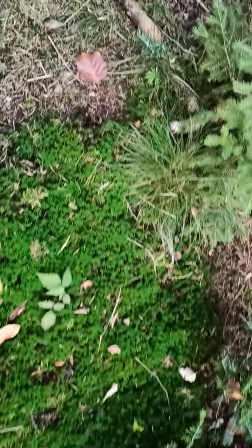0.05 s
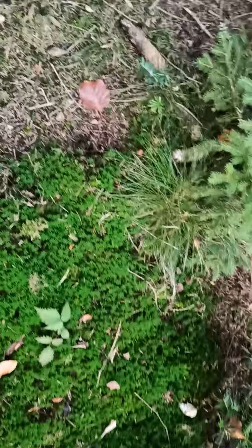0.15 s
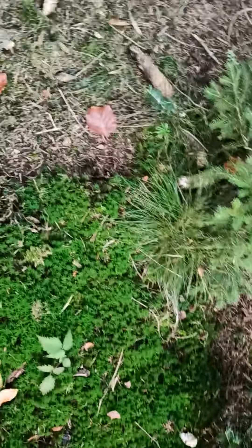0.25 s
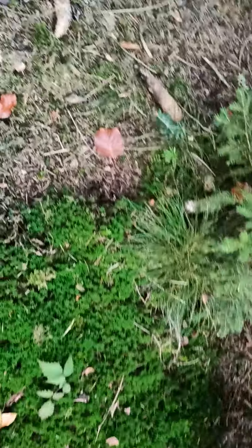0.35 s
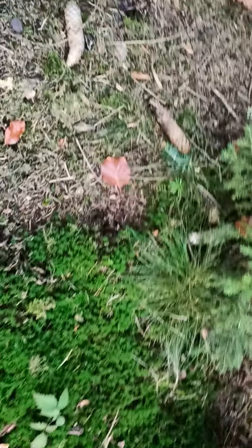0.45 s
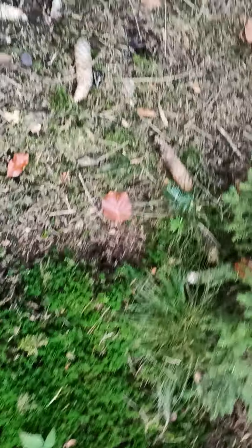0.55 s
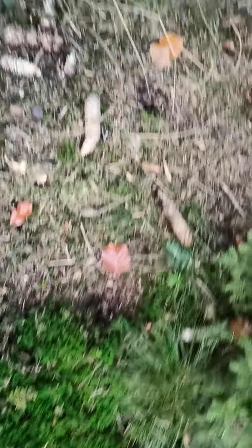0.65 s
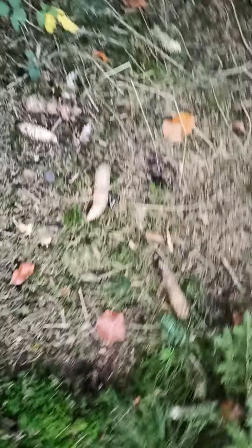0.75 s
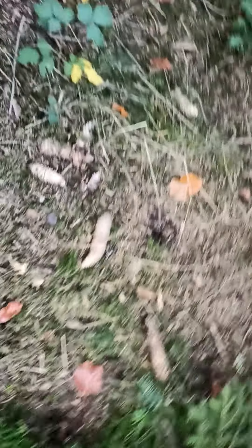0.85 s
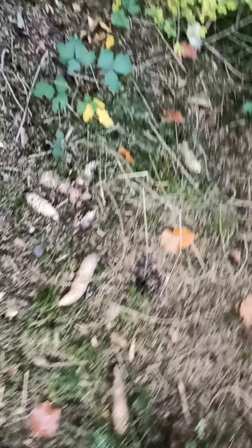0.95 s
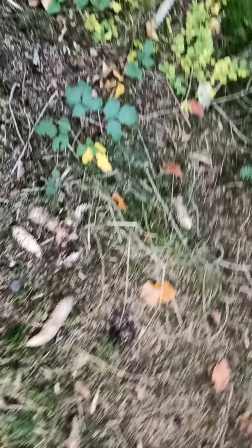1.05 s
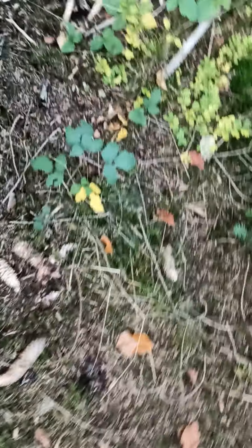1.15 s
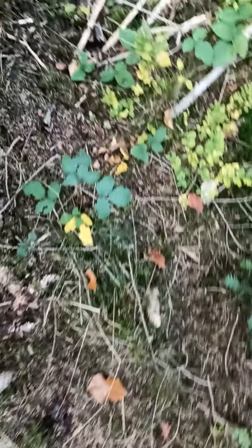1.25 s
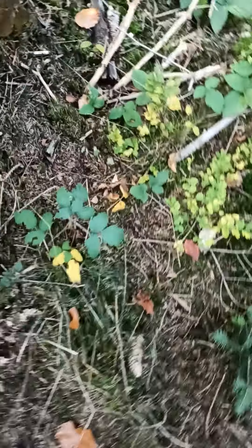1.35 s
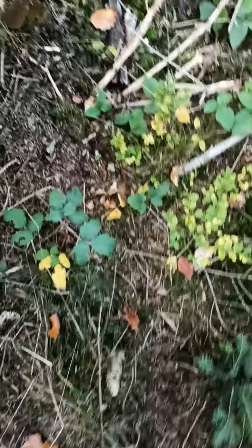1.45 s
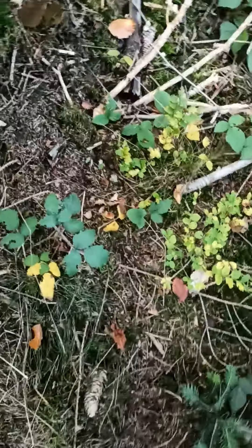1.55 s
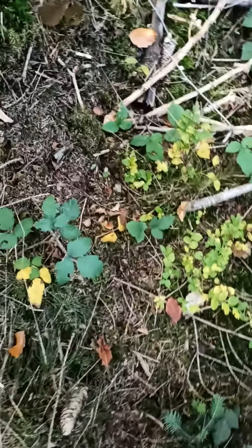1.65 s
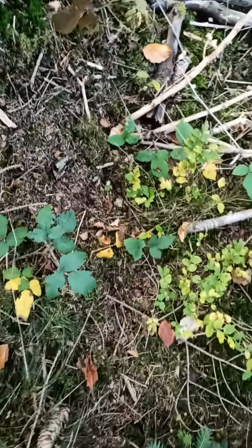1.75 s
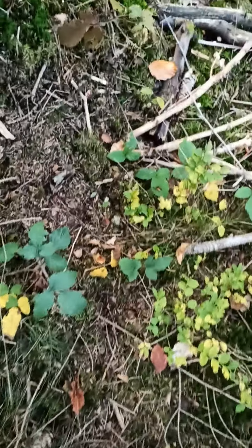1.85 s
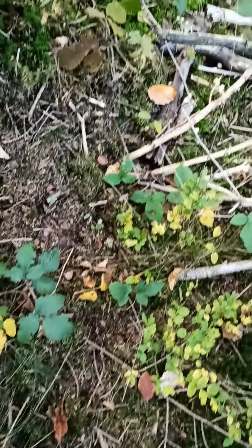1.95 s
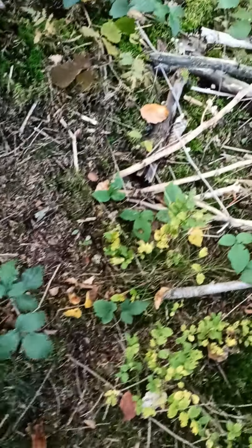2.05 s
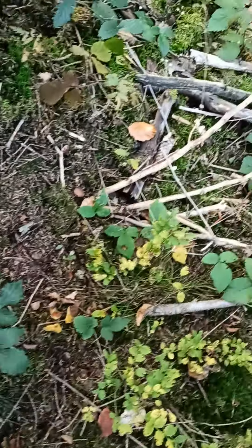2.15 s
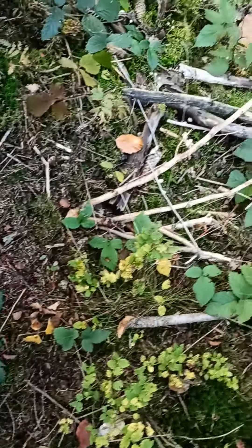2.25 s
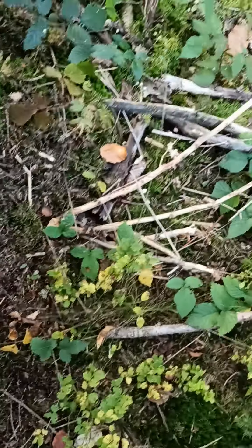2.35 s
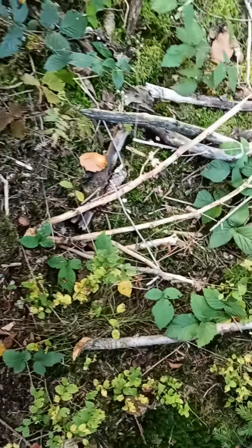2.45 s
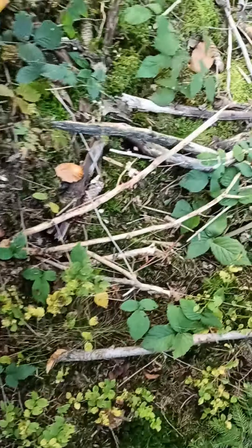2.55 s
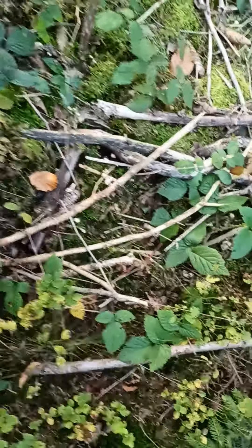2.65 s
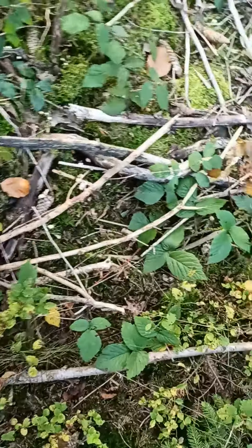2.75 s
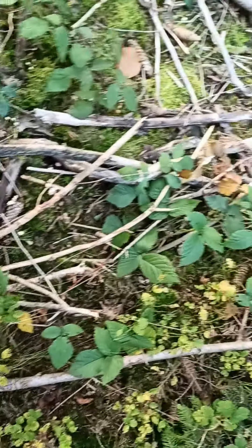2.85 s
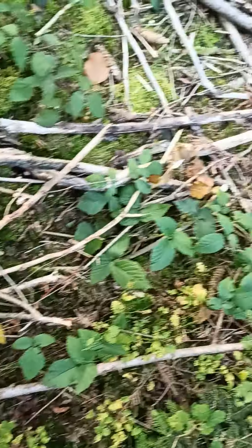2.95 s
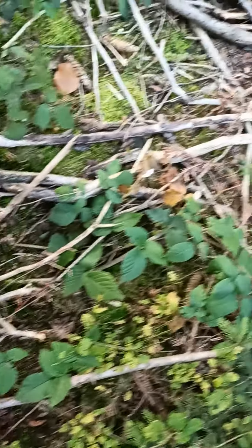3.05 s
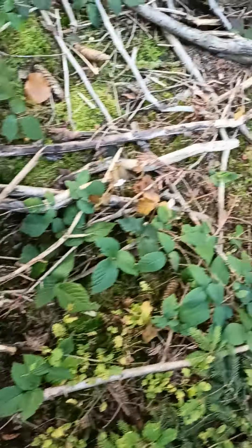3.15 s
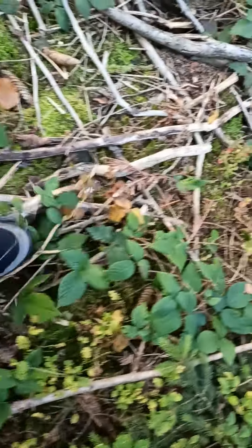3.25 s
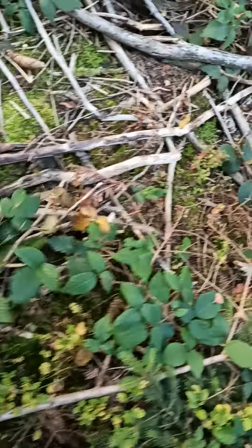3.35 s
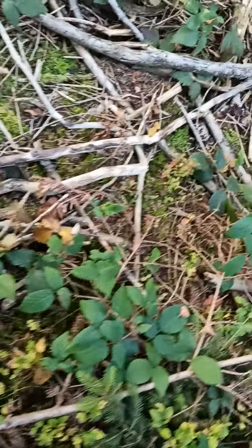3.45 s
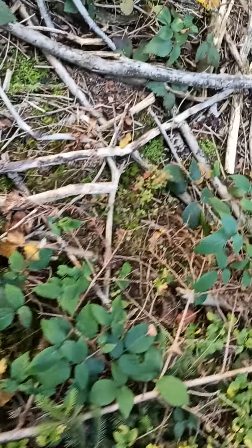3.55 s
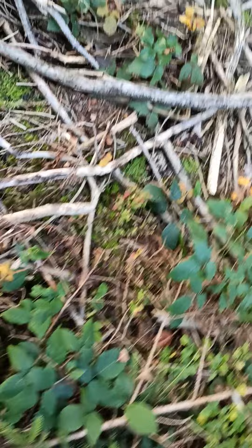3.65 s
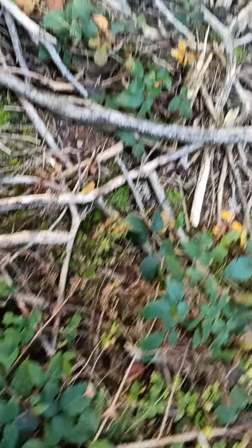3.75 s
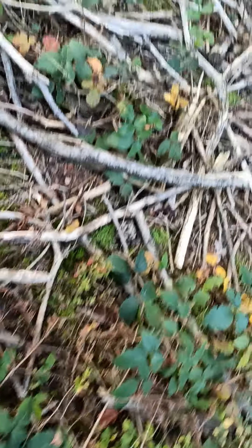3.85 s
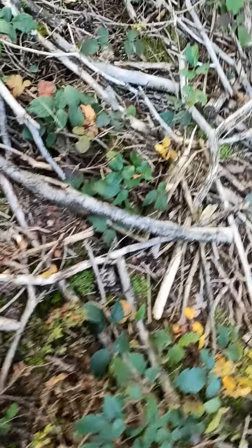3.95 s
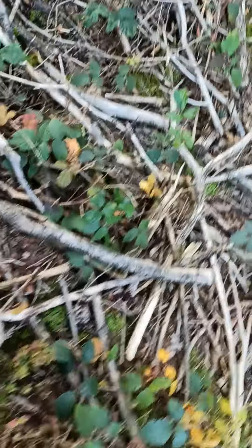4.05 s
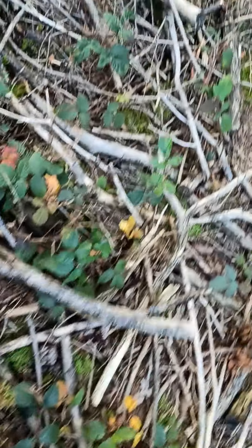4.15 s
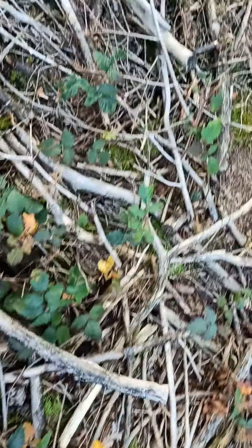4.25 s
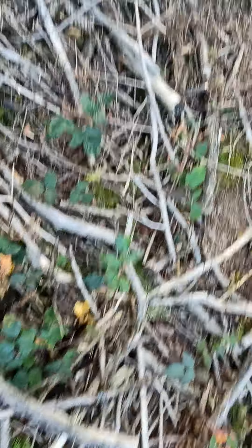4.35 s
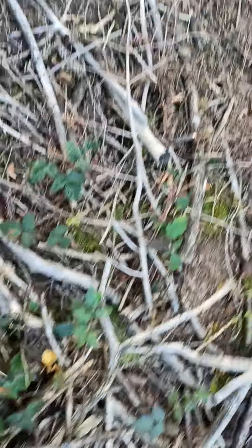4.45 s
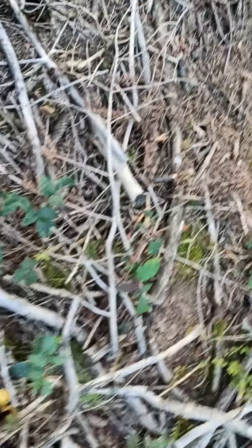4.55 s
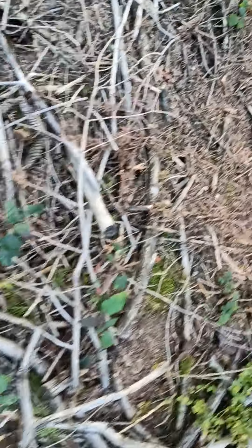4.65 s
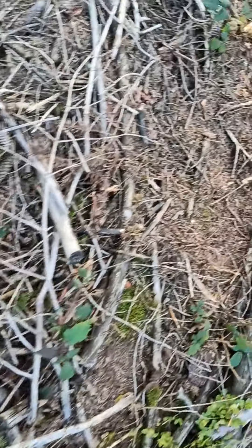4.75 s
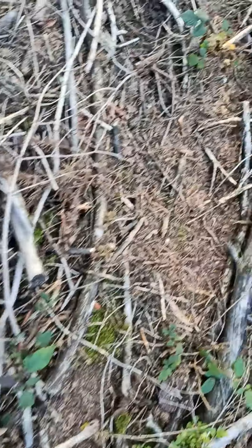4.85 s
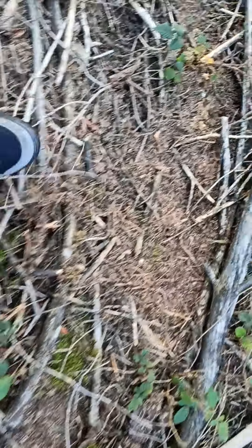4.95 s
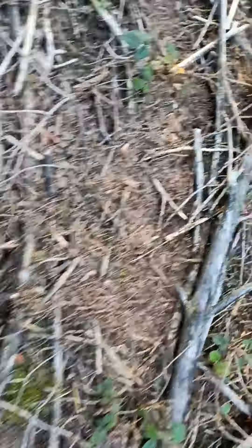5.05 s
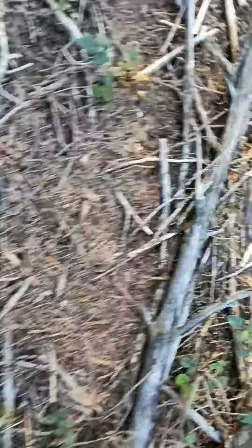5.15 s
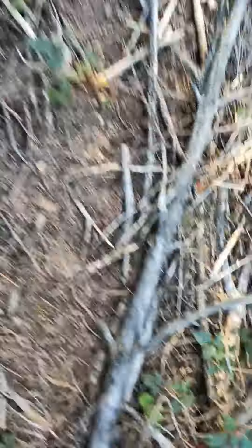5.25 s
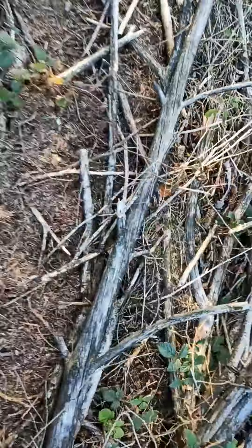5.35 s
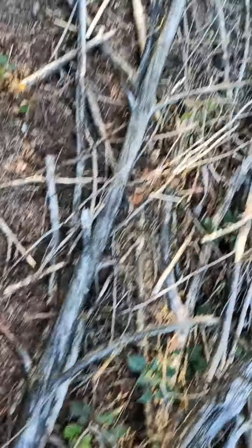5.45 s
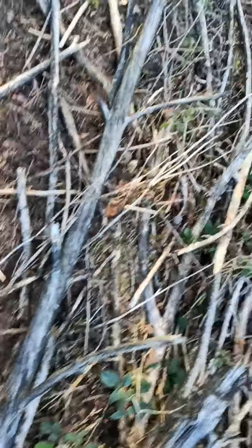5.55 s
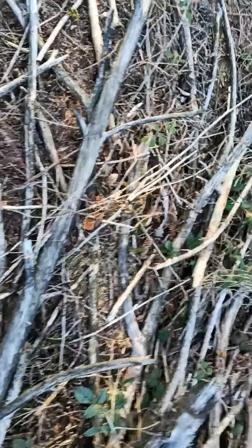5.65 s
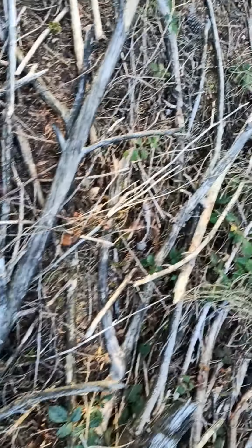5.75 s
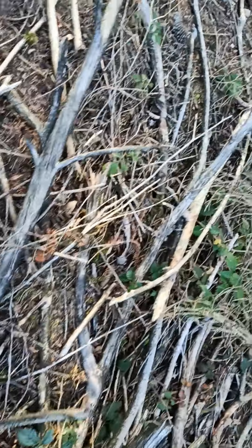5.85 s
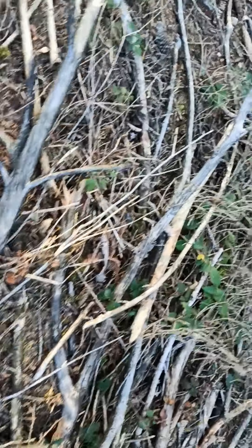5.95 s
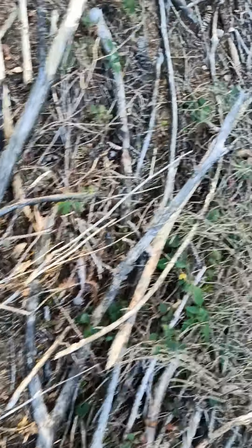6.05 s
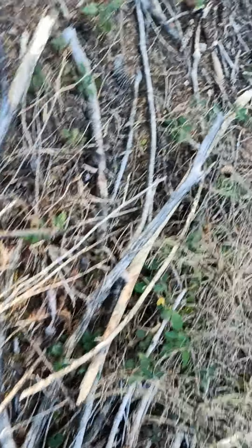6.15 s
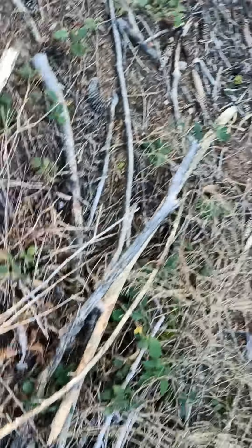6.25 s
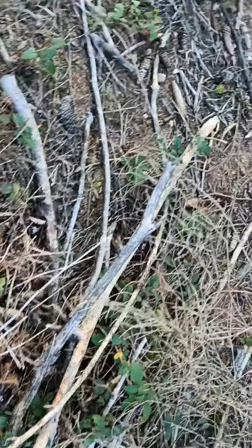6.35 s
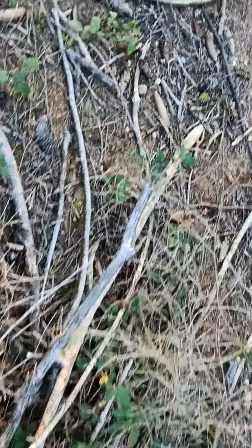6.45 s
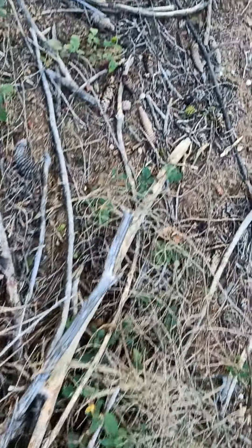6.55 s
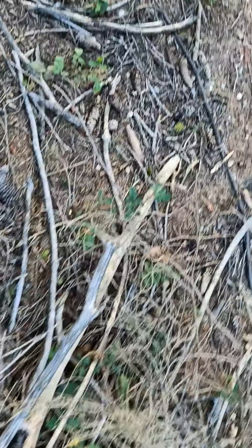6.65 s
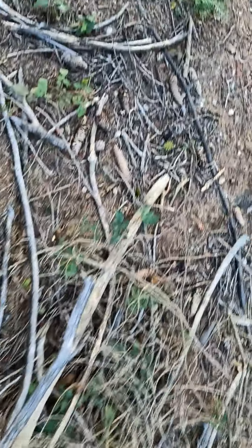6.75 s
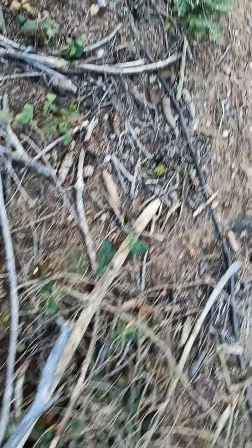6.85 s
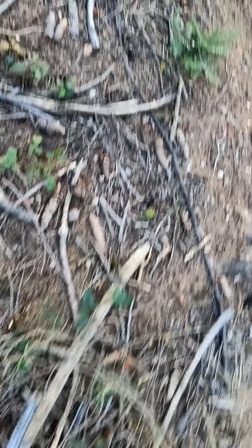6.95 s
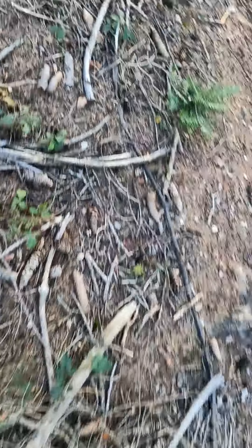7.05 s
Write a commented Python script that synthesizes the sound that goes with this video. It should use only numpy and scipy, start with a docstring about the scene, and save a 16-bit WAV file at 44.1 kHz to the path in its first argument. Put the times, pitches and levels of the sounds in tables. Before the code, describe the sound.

A walker treads through a quiet forest, quiet rustles giving way to crackling fallen branches, brittle snaps in quick runs and dull thuds.

```python
"""Forest path, a walker's shoes close by: first soft moss, then dry twigs and fallen branches.
Each step presses the litter into a fine crackle, made of clumped tiny noise bursts in four layers.
Twigs snap singly and in quick runs: bright noise bursts with a short wooden knock.
The weight lands with dull thuds, low damped swings with a rumble; ground and trunks scatter the cracks.
A faint steady hush lies behind; the microphone is bright and uneven in the treble."""
import sys
import numpy as np
from scipy import signal
from scipy.fft import rfft, irfft
from scipy.io import wavfile
from scipy.ndimage import uniform_filter1d

SR = 44100
rng = np.random.default_rng(int(sys.argv[2]) if len(sys.argv) > 2 else 0)


def generate_wav(sig):
    """Save sig (samples, or channels by samples) to the path in sys.argv[1] as 16-bit PCM at SR."""
    pcm = np.round(np.clip(np.atleast_2d(sig).T, -1, 1) * 32767).astype(np.int16)
    wavfile.write(sys.argv[1], SR, pcm)


N = 312669

# Loud twigs, levels as energy over 1 ms before the trims in snap():
# start_s, crack_db, splinter_fizz_db, wood_knock_db, wood_pitch_hz, decay_ms
LOUD_TWIGS = [(.9918, -51.5, -58, -54, 2930, 1.3), (1.151, -55, -43.5, -42, 1130, 1),
              (1.4823, -66, -69, -45.5, 535, 4.8), (1.7444, -67, -69, -49.5, 825, 4.5),
              (2.2336, -60, -54, -50.5, 1888, 1.7), (2.826, -52, -51, -45.5, 1410, 0.61),
              (3.276, -64, -61, -43, 1350, 3.9), (3.3158, -68, -69, -41, 700, 3.3),
              (3.372, -39.5, -44, -37, 1186, 6.6), (3.4503, -27.5, -25.5, -26.5, 2165, 2.7),
              (3.463, -32, -43, -38, 2390, 1.6), (3.588, -35, -30.5, -35.5, 1760, 2.1),
              (3.632, -30.5, -29.5, -28.5, 2810, 2.2), (3.9208, -59, -54, -39, 2110, 1.36),
              (4.285, -40, -37, -50, 2734, 0.49), (4.318, -35.5, -30.5, -24.5, 2060, 0.45),
              (4.4618, -28, -27, -28.5, 3660, 1.6), (4.6077, -36, -25, -43.5, 2310, 1.7),
              (4.6746, -39, -28.5, -46, 2400, 2.8), (4.7531, -29.5, -22, -36, 1840, 1.6),
              (4.8107, -45.5, -43, -54, 1810, 1.9), (4.9195, -30, -35, -24, 2315, 3.8),
              (4.9583, -38, -30, -40, 2980, 2.9), (5.099, -41.5, -32.5, -34.5, 5410, 2.1),
              (5.186, -35, -43, -35.5, 2050, 3.1), (5.1976, -25.5, -23, -23, 2260, 2.1),
              (5.2425, -40, -27.5, -21.5, 2322, 0.94), (5.261, -43, -39, -34, 1420, 2.4),
              (5.3545, -38, -33, -32.5, 2133, 1.6), (5.4561, -35, -26, -26.5, 1387, 1),
              (5.4633, -27, -31, -27, 1490, 1.4), (5.4682, -25, -26, -17, 2700, 0.85),
              (5.479, -33, -30, -26.5, 1800, 1.4), (5.6156, -31.5, -34, -41, 2920, 0.96),
              (5.6474, -37.5, -47, -37.5, 2050, .7), (5.7211, -48, -51, -45, 1340, 1.5),
              (5.903, -42.5, -42, -36.5, 980, 2.1), (5.9135, -39, -40, -29.5, 950, 0.75),
              (5.923, -38.5, -39, -39.5, 1720, 0.78), (6.0057, -28.5, -18.5, -33, 1900, 2.9),
              (6.0173, -37, -35, -29.5, 1610, 0.87), (6.053, -41, -33.5, -43, 2250, 0.57),
              (6.0783, -46, -43, -31.5, 2860, 1.7), (6.103, -33.5, -31.5, -33, 2650, 2.2),
              (6.1241, -49, -41, -30.5, 1620, 0.87), (6.1398, -29, -29, -24, 1730, 2.1),
              (6.17, -36, -37, -41, 2500, 0.74), (6.1895, -38, -35, -37.5, 1037, 3.7),
              (6.2252, -51.5, -32.5, -28, 1520, 2.7), (6.2488, -30.5, -24, -29.5, 1670, 0.33),
              (6.2695, -32, -30, -35, 3130, 5.8), (6.279, -31, -17, -29, 1420, 1.2),
              (6.348, -27.5, -40, -40, 1210, 2.6), (6.3523, -25.5, -26, -23, 730, 0.5),
              (6.4096, -30.5, -26, -32.5, 1440, 0.6), (6.4509, -23.5, -39, -28, 1600, 0.88),
              (6.467, -54, -43, -32, 3030, 0.73), (6.5243, -39, -41, -43, 3160, 1.2),
              (6.546, -37.5, -30, -39, 2700, 0.44), (6.666, -55, -47, -48, 2950, 0.63),
              (6.8652, -66, -61, -39.5, 1787, 1.6), (7.037, -37, -41, -39, 1215, 0.72),
              (7.0734, -39, -35, -33, 1320, 0.56), (7.0817, -31, -32, -35, 1070, 1)]
# Lesser twigs break by chance, more often and more loudly the harder the shoe presses
SMALL_MAX_PER_S, SMALL_HALF_RATE_DB, SMALL_SPREAD_DB = 22, -51, 1
# crack and fizz above the crackle level, wood above the crunch level
SMALL_CRACK_DB, SMALL_FIZZ_DB, SMALL_WOOD_DB = 6, 6.5, 12.5
SMALL_HZ, SMALL_OCTAVES, SMALL_DECAY_MS = 1800, 0.25, 1.14

# A shoe presses or brushes the litter, levels before the layer trims in litter():
# start_s, swell_s, hold_s, needle_crackle_db, small_twig_crunch_db, soil_db
SHOE_PRESSES = [(0, 0.0058, 0.18, -65, -64, -61), (0.623, 0.035, 0.19, -73, -68.5, -62),
                (1.149, 0.044, 0.014, -60.5, -59.5, -67), (1.261, 0.053, 0.0071, -61.5, -60, -63),
                (1.376, 0.041, 0.1, -63.5, -61.5, -58.5), (1.512, 0.056, 0.082, -67.5, -67, -73),
                (1.697, 0.05, 0.055, -67, -67, -58), (1.974, 0.098, 0.039, -62, -65, -62.5),
                (2.15, 0.041, 0.027, -65, -62.5, -63.5), (2.388, 0.023, 0.023, -62, -51, -64),
                (2.425, 0.054, .02, -62, -62.5, -74), (2.512, 0.022, 0.014, -52, -56.5, -64),
                (2.643, 0.068, 0.15, -68.5, -62.5, -66), (3.249, 0.018, 0.02, -59, -51.5, -55.5),
                (3.302, 0.034, 0.14, -51.5, -48.5, -52), (3.528, 0.072, 0.046, -56.5, -54, -53),
                (4.005, 0.007, 0.0083, -50, -54, -53.5), (3.936, 0.093, 0.13, -52.5, -56.5, -60.5),
                (4.168, 0.057, 0.11, -52, -53, -51), (4.351, 0.028, 0.098, -57, -59.5, -56.5),
                (4.588, 0.017, 0.037, -67, -61.5, -78), (4.715, .03, 0.24, -63.5, -80, -75),
                (4.93, 0.075, .17, -55.5, -62.5, -61), (5.099, 0.12, 0.073, -41, -47, -48.5),
                (5.295, 0.039, 0.085, -51, -54.5, -56), (5.434, 0.037, 0.1, -47.5, -57, -54),
                (5.597, 0.0072, 0.0067, -49.5, -61, -57), (5.921, 0.088, 0.052, -51, -61, -69),
                (6.09, 0.044, .09, -50, -54, -53.5), (6.204, 0.032, 0.092, -46, -53, -52),
                (6.369, 0.037, 0.012, -41, -48.5, -45.5), (6.452, 0.022, 0.21, -54.5, -60.5, -64),
                (6.742, 0.076, 0.015, -52, -54.5, -57), (6.92, 0.16, .02, -52.5, -51, -48.5)]
PRESS_SAG_DB_PER_S, PRESS_RELEASE_DB_PER_S, PRESS_SWELL_POWER = 26, 223, 1.31
# Between presses the undergrowth keeps stirring faintly
IDLE_CRACKLE_DB, IDLE_CRUNCH_DB, IDLE_SOIL_DB = -71.5, -68, -65.5
# Change of that stirring as the moss gives way to twigs: time_s, relative_level_db
STIRRING_CURVE = [(0, -1.5), (.35, -3.5), (.6, -3), (.8, 0), (1.9, -1), (2.8, 2), (3.15, 1), (3.8, 1.5),
                  (7, 2)]

# Spectra of the litter from top to bottom: frequency_hz, relative_level_db
NEEDLE_SPECTRUM = [(3500, -62), (4400, -3.5), (5000, 0.5), (7000, 1.5), (10000, -7.5), (13000, -0.5),
                   (16000, -5)]
SPLINTER_SPECTRUM = [(1500, -41), (2300, 0.5), (3000, -2.5), (3800, 1.5), (4600, 1), (5500, -8),
                     (8000, -57)]
SMALL_TWIG_SPECTRUM = [(300, -31), (600, -12), (800, 2.5), (1200, 1), (1900, -1.5), (2400, -7),
                       (3300, -16.5), (6000, -35)]
SOIL_SPECTRUM = [(20, -24), (50, -20), (90, 1.5), (140, -0.5), (210, -1.5), (300, 0.5), (450, -3.5),
                 (620, -4), (900, -15), (2000, -47.5)]

# Weight landing on the ground, level of the swing before its rise and decay:
# start_s, level_db, pitch_hz, decay_s
GROUND_THUDS = [(.775, -58, 85, 0.019), (3.048, -48, 85.2, 0.028), (3.075, -48.5, 113.7, 0.06),
                (3.272, -42, 166, 0.017), (3.313, -41, 209, 0.012), (3.466, -37, 133, 0.0092),
                (4.46, -35.5, 125, 0.015), (5.249, -43, 134.6, 0.021), (6.019, -38.5, 161, .01),
                (6.178, -40, 127, 0.016), (6.275, -27.5, 100, 0.0048), (6.351, -15, 125, 0.003),
                (6.778, -45, 386, 0.0089), (6.866, -43, 375, .006), (6.91, -43, 374, 0.0066)]
# When a twig gives way the shoe drops onto the ground, harder after a louder break
DROP_DB, DROP_HZ, DROP_DECAY_S, DROP_DELAY_S = -18.5, 125, 0.012, 0.0019

# Hush among the trees: frequency_hz, relative_level_db
AIR_SPECTRUM = [(20, -34), (50, 7), (90, -2.5), (330, 10.5), (500, 0.5), (800, -0.5), (1300, -2),
                (3000, -13), (8000, -21), (16000, -19)]
# Broad shelves of the microphone: frequency_hz, gain_db
MICROPHONE_SHELVES = [(4650, 0), (4800, -5.5), (6000, -4), (6200, 4), (8480, 3), (8650, -6), (11300, -11.5),
                      (11600, 0), (12700, -2), (15700, 2)]
# A dip and narrow resonances of the microphone: frequency_hz, width_hz, gain_db
MICROPHONE_PEAKS = [(1200, 420, -2.5), (6760, 500, 3.5), (7310, 690, 3.5), (7532, 220, 7.5), (8380, 330, 6)]
EDGE_HZ = 16050  # upper band limit


def amp(db):
    """Amplitude of a level in dB."""
    return 10 ** (np.asarray(db) / 20)


def evened(x):
    """Scales a sound to an RMS of one."""
    return x / np.sqrt(np.mean(x ** 2) + 1e-20)


def read(points, hz):
    """A spectrum joined by straight lines over log frequency."""
    point_hz, db = np.transpose(points)
    return np.interp(np.log(hz + 1), np.log(point_hz + 1), db)


def add(mix, start_s, sound):
    """Lays a sound into the mix in place."""
    part = mix[max(round(start_s * SR), 0):][:len(sound)]
    part += sound[:len(part)]


def colour(x, db_at, size=4096):
    """Causal filter with the gain db_at(Hz), so that clicks keep their sharp front."""
    log_gain = np.log(amp(db_at(abs(np.fft.fftfreq(size, 1 / SR)))))
    taps = np.fft.ifft(np.exp(np.conj(signal.hilbert(log_gain)))).real
    return signal.oaconvolve(x, taps[:size // 2])[:len(x)]


def band(x, lo_hz, hi_hz):
    """Keeps one frequency band."""
    edges = np.clip([lo_hz, hi_hz], 10, SR / 2 - 100)
    return signal.sosfilt(signal.butter(3, edges, "band", fs=SR, output="sos"), x)


def burst_at(x, db):
    """Scales a short sound to the energy that the level db has over 1 ms."""
    return amp(db) * x / np.sqrt(np.sum(x ** 2) / (SR / 1000) + 1e-20)


def snap(crack_db, fizz_db, wood_db, wood_hz, decay_ms, rise_ms=0.059, break_ms=0.15, octaves=0.84, ring=1.83):
    """Fibres tear in a short bright burst, and the freed stick knocks in many crowded, quickly damped modes."""
    ms = np.arange(SR // 20) * 1000 / SR
    noise = rng.standard_normal((4, len(ms)))
    decay_ms = max(decay_ms, 0.3)
    onset = 1 - np.exp(-ms / rise_ms)
    dying = onset * np.exp(-ms / decay_ms)
    # a few fibres give first, then the whole section breaks at once
    tearing = dying + 0.59 * np.exp(-(ms / break_ms - 2) ** 2)
    crack = burst_at(band(tearing * noise[0], 4150, 9100), crack_db + 2.0)
    fizz = burst_at(band(tearing * noise[1], 11640, 15400), fizz_db + 0.73)

    def stick_db(hz):
        """The knock is strongest near the pitch of the stick."""
        hump = 8 * np.exp(-0.5 * (np.log2((hz + 1) / wood_hz) / octaves) ** 2)
        return hump - 2.6 * np.log2(1 + hz / wood_hz)

    knock = band(colour(dying * noise[2], stick_db, size=512), 137, 9700)
    knock = burst_at(knock, wood_db + 0.32)
    # its low bending modes ring on a little longer
    ringing = onset * np.exp(-ms / (ring * decay_ms))
    bending = burst_at(band(ringing * noise[3], 160, wood_hz / 2), wood_db - 7)
    return crack + fizz + knock + bending


def twigs():
    """The loud twigs that break outright."""
    out = np.zeros(N)
    for start_s, *twig in LOUD_TWIGS:
        add(out, start_s, snap(*twig))
    return out


def small_twigs(crackle_db, crunch_db, count=320):
    """Thin twigs lie all along the way; the pressure on each sets its chance of breaking."""
    out = np.zeros(N)
    place, luck = rng.random((count, 2)).T
    character = np.clip(rng.standard_normal((count, 4)), -1.5, 1.5)
    for k, (strength, bright, woody, pitch) in enumerate(character):
        at = int((k + place[k]) / count * (N - 1))
        per_s = SMALL_MAX_PER_S / (1 + amp(SMALL_HALF_RATE_DB - crackle_db[at]))
        if luck[k] < per_s * N / SR / count:
            db = crackle_db[at] + SMALL_SPREAD_DB * strength
            crack_db = db + SMALL_CRACK_DB
            fizz_db = db + SMALL_FIZZ_DB + SMALL_SPREAD_DB * bright
            wood_db = crunch_db[at] + SMALL_WOOD_DB + SMALL_SPREAD_DB * woody
            wood_hz = SMALL_HZ * 2 ** (SMALL_OCTAVES * pitch)
            add(out, at / SR, snap(crack_db, fizz_db, wood_db, wood_hz, SMALL_DECAY_MS))
    return out


def pressed(levels_db, idle_db):
    """Level in dB over time: each press swells, sags while the weight rests, then dies away."""
    t = np.arange(N) / SR
    power = amp(idle_db + np.interp(t, *np.transpose(STIRRING_CURVE))) ** 2
    age = t[:SR]
    for (start_s, swell_s, hold_s, *_), db in zip(SHOE_PRESSES, levels_db):
        rise = np.minimum(age / max(swell_s, 0.005), 1) ** PRESS_SWELL_POWER
        sag_db = PRESS_SAG_DB_PER_S * np.maximum(age - swell_s, 0)
        release_db = PRESS_RELEASE_DB_PER_S * np.maximum(age - swell_s - hold_s, 0)
        add(power, start_s, (rise * amp(db - sag_db - release_db)) ** 2)
    return 10 * np.log10(power)


def tread():
    """How hard the needles, the small twigs and the soil are worked, in dB over time."""
    *_, crackle, crunch, soil = np.transpose(SHOE_PRESSES)
    return pressed(crackle, IDLE_CRACKLE_DB), pressed(crunch, IDLE_CRUNCH_DB), pressed(soil, IDLE_SOIL_DB)


def grains(per_s, spread_db, decay_ms, clump_db, count=32):
    """Countless tiny fractures that come in clumps; each kind of stalk has a ragged burst and a pitch of its own."""
    breaks_now = rng.random(N) < per_s / SR
    size = amp(spread_db * np.minimum(rng.exponential(1, N), 3.2)) * breaks_now
    clumps = evened(uniform_filter1d(rng.standard_normal(N), size=350))
    size = size * amp(clump_db * clumps)
    kind = rng.integers(0, count, N)
    ms = np.arange(SR // 100) * 1000 / SR
    out = np.zeros(N)
    for k, hz in enumerate(np.geomspace(350, 15000, count)):
        life_ms = decay_ms * (4000 / hz) ** 0.11
        burst = rng.standard_normal(len(ms)) * np.exp(-ms / life_ms)
        burst = band(burst, hz / 1.454, hz * 1.69) + 0.19 * burst
        out += signal.oaconvolve(size * (kind == k), burst / np.sqrt(life_ms))[:N]
    # all kinds together favour no pitch
    spectrum = rfft(out)
    smooth_power = abs(uniform_filter1d(abs(spectrum) ** 2, size=1500))
    return evened(irfft(spectrum / np.sqrt(smooth_power + 1e-9), N))


def litter_layer(fractures, spectrum, level_db, grainy, soft_db):
    """One depth of the litter: a light touch mostly rubs, a level above soft_db breaks more and more."""
    share = np.clip(grainy / (1.5 + np.exp((soft_db - level_db) / 5)), 0, 1)
    drive = np.sqrt(share) * fractures + np.sqrt(1 - share) * rng.standard_normal(N)
    sound = colour(drive, lambda hz: read(spectrum, hz))
    # a steady weight breaks about the same amount from moment to moment
    running_power = abs(uniform_filter1d(sound ** 2, size=2400))
    return amp(level_db) * sound / np.sqrt(running_power + 1e-12)


def litter(crackle_db, crunch_db, soil_db):
    """The same fractures sound in the needles, the splinters, the small twigs and the soil beneath."""
    fractures = grains(per_s=1150, spread_db=5.5, decay_ms=0.51, clump_db=3.5)
    splinter_db = (crackle_db + crunch_db) / 2 - 2.0
    needles = litter_layer(fractures, NEEDLE_SPECTRUM, crackle_db + 1.2, grainy=0.98, soft_db=-68)
    splinters = litter_layer(fractures, SPLINTER_SPECTRUM, splinter_db, grainy=1.0, soft_db=-67.5)
    sticks = litter_layer(fractures, SMALL_TWIG_SPECTRUM, crunch_db - 0.4, grainy=1.0, soft_db=-64)
    soil = litter_layer(fractures, SOIL_SPECTRUM, soil_db + 0.25, grainy=0.9, soft_db=-60)
    return needles + splinters + sticks + soil


def thuds(rise_s=0.0018, rumble=0.74):
    """The springy ground gives under the foot: a low damped swing with a rumble of loose soil around its pitch."""
    t = np.arange(SR // 4) / SR
    out = np.zeros(N)
    drops = [(start_s + DROP_DELAY_S, (crack_db + wood_db) / 2 + DROP_DB, DROP_HZ, DROP_DECAY_S)
             for start_s, crack_db, _, wood_db, *_ in LOUD_TWIGS]
    for start_s, db, hz, decay_s in [*GROUND_THUDS, *drops]:
        loose_soil = evened(band(rng.standard_normal(len(t)), hz / 1.73, hz * 1.63))
        swing = np.sin(2 * np.pi * hz * t) + rumble * loose_soil
        envelope = (1 - np.exp(-t / rise_s)) * np.exp(-t / decay_s)
        add(out, start_s, amp(db) * swing * envelope)
    return out


def scatter(x, db, t60_s, delay_s):
    """Diffuse reflections that start after a delay and die away by 60 dB in t60_s."""
    t = np.arange(SR // 2) / SR
    tail = band(rng.standard_normal(len(t)), 200, 14000) * (t > delay_s) * 1000 ** (-t / t60_s)
    return amp(db) * signal.oaconvolve(x, tail / np.linalg.norm(tail))[:N]


def forest_air():
    """The faint steady hush among the trees, as coloured noise."""
    return amp(-68.5) * evened(colour(rng.standard_normal(N), lambda hz: read(AIR_SPECTRUM, hz)))


def scene():
    """Breaking twigs, whose cracks come back from the ground and the trunks, over litter, thuds and air."""
    crackle_db, crunch_db, soil_db = tread()
    breaks = twigs() + small_twigs(crackle_db, crunch_db)
    underfoot = litter(crackle_db, crunch_db, soil_db) + thuds()
    # the ground answers sooner than the more distant trunks
    ground = scatter(breaks, db=-18.5, t60_s=0.027, delay_s=0.0035)
    trunks = scatter(breaks, db=-29, t60_s=1.0, delay_s=0.0092)
    return (breaks + underfoot + ground + trunks + forest_air())[None]


def microphone_db(hz):
    """Shelves with a dip and a few narrow resonances on top."""
    peaks_db = sum(db / (1 + (2 * (hz - peak_hz) / width_hz) ** 2)
                   for peak_hz, width_hz, db in MICROPHONE_PEAKS)
    return read(MICROPHONE_SHELVES, hz) + peaks_db


def record(dry, low_cut_hz=30):
    """Microphone colour without phase shift, a gentle low cut, then the band limit."""
    hz = np.fft.rfftfreq(2 * N, 1 / SR)
    gain = amp(microphone_db(hz)) * hz / np.hypot(hz, low_cut_hz)
    heard = irfft(rfft(dry[0], 2 * N) * gain)[:N]
    low_pass = signal.firwin(201, EDGE_HZ, window=("kaiser", 8), fs=SR)
    return signal.oaconvolve(heard, low_pass, "same")[None]


dry = scene()
out = record(dry)
generate_wav(out)
```